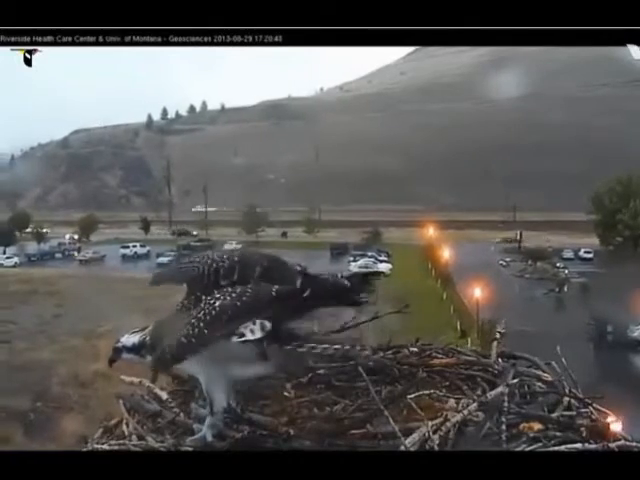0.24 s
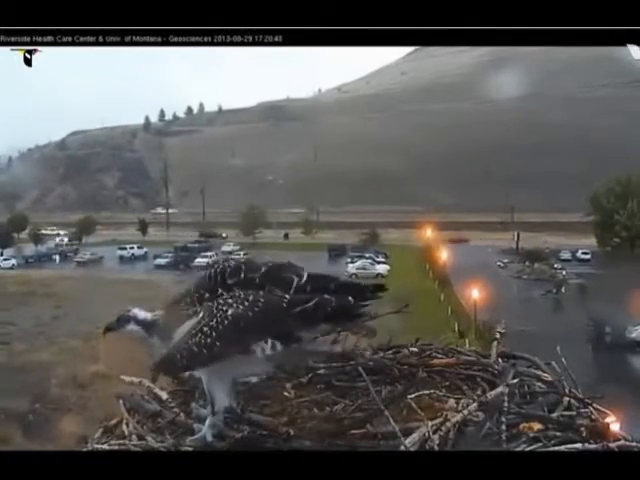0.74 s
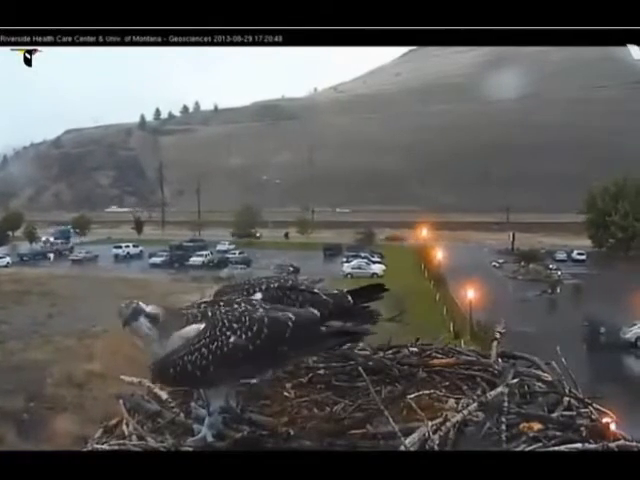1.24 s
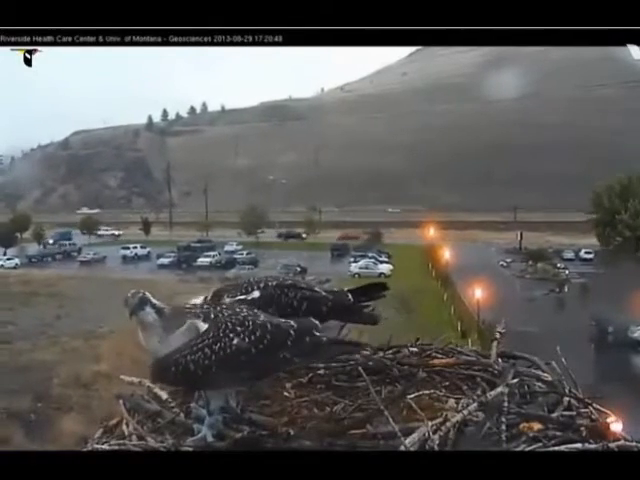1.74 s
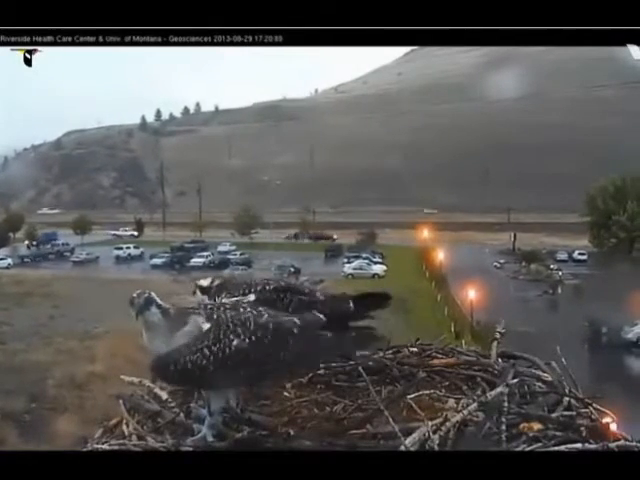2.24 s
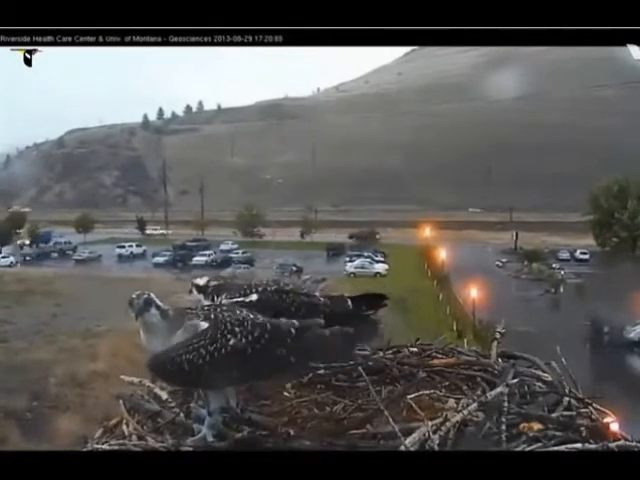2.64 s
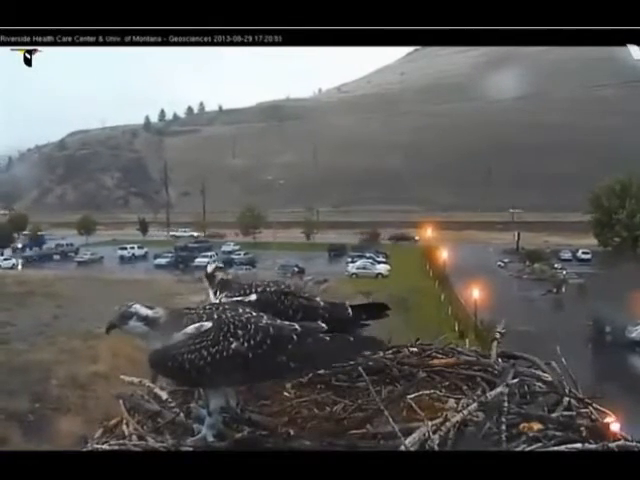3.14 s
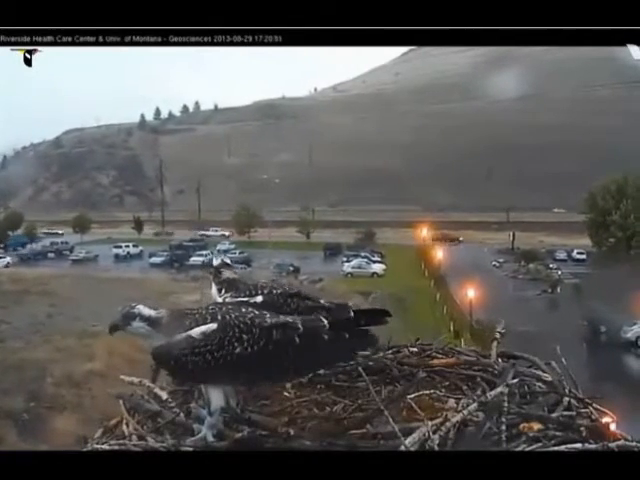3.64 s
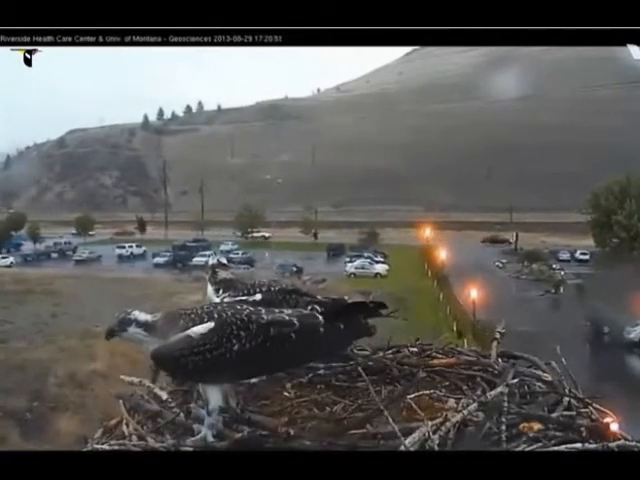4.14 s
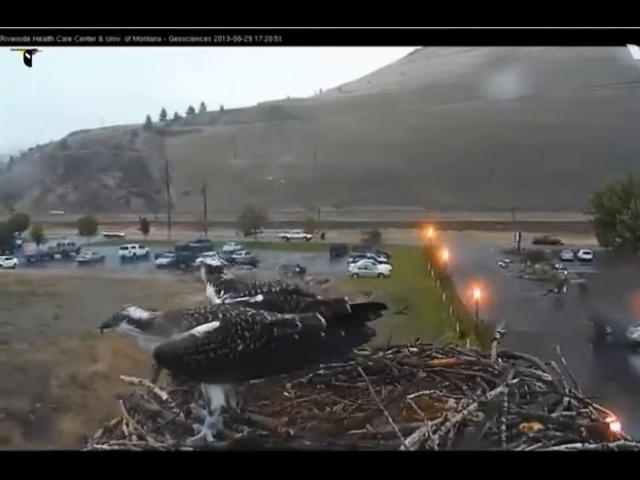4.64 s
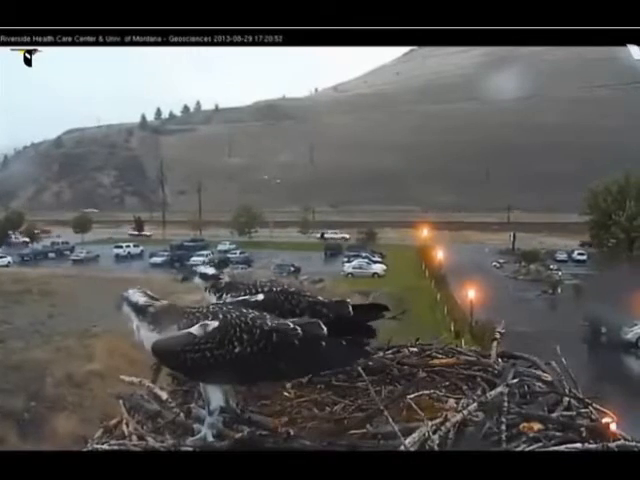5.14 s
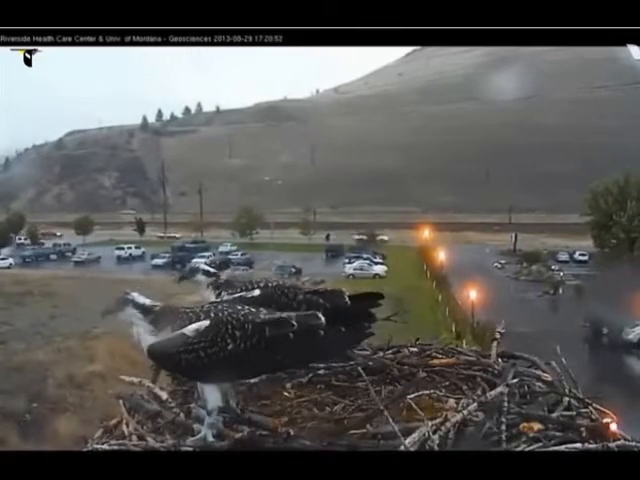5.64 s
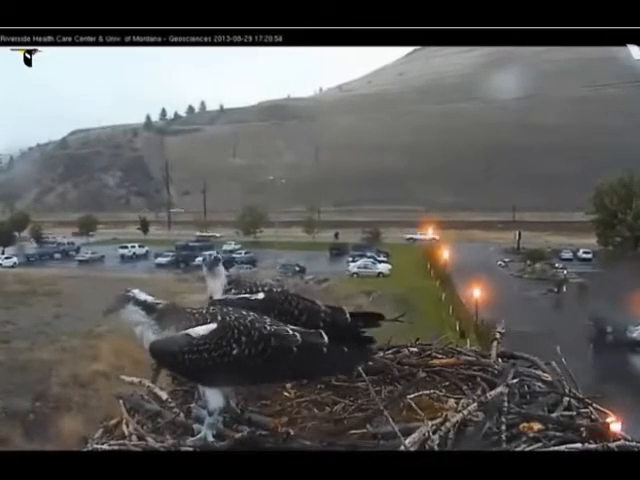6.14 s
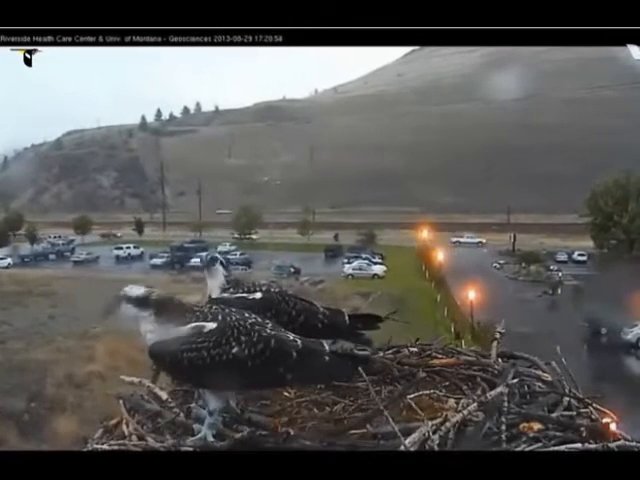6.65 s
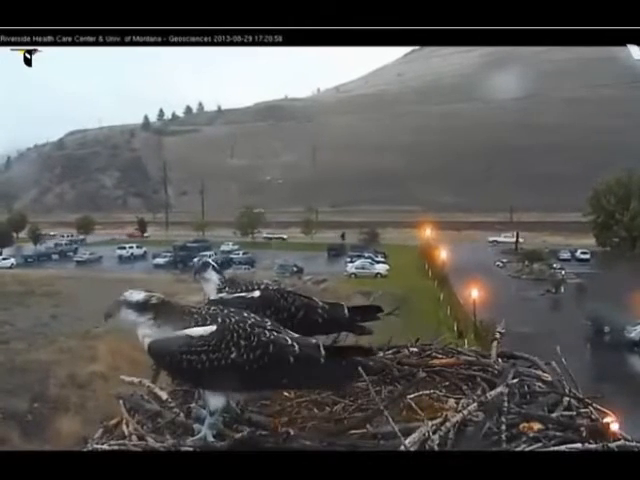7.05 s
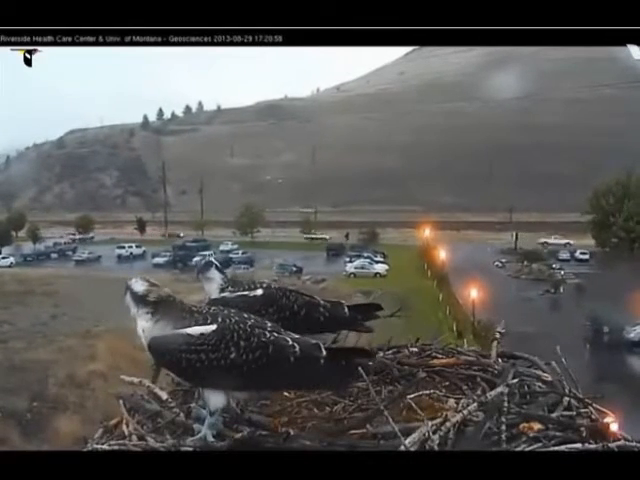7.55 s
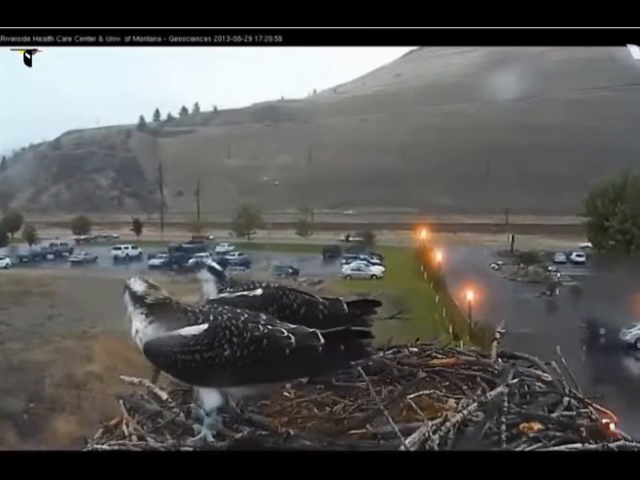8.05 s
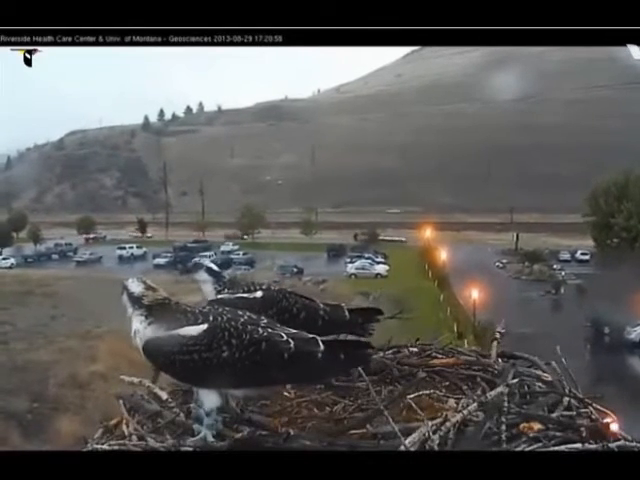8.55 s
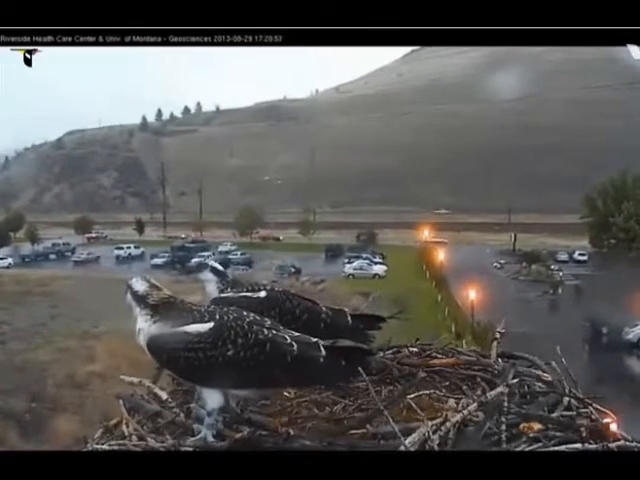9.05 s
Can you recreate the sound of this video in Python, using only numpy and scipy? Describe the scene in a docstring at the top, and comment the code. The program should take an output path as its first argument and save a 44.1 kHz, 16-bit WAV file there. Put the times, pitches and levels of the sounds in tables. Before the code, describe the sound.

Rainy, windy outdoor nest: rumbling wind buffets the microphone over even rain hiss, with plinking near drops, dull knocks and one faint bird cheep.

```python
"""On an open, high pole: steady rain and a gusting wind, heard through a small boxed microphone.
Wind roars at the housing (lumpy low noise); rain hisses all round (shaped noise over short ringing grains).
Single drops tick close by and soft thumps hit the box (struck resonances with noise bursts).
A bird gives one short cheep (a falling two-partial whistle), over an even, faint far hiss.
Roar and hiss flutter together and dip for milliseconds at a time."""
import sys
import numpy as np
from scipy import signal
from scipy.fft import rfft, irfft, next_fast_len
from scipy.io import wavfile

SR = 44100
rng = np.random.default_rng(int(sys.argv[2]) if len(sys.argv) > 2 else 0)


def int16_out(signal):
    """Quantize to a 16-bit WAV file."""
    q = np.round(np.clip(np.atleast_2d(signal).T, -1, 1) * 32767)
    wavfile.write(sys.argv[1], SR, q.astype(np.int16))


N = 409686
PADDED = next_fast_len(N)


def from_db(db):
    """Decibels to gain."""
    return 10 ** (np.asarray(db) / 20)


def rms_one(x):
    """Scale to rms 1."""
    return x / np.sqrt(np.mean(x ** 2) + 1e-20)


def peak_one(x):
    """Scale to peak 1."""
    return x / np.abs(x).max()


def butter(order, hz, kind, x):
    """Butterworth-filter x."""
    return signal.sosfilt(signal.butter(order, hz, kind, fs=SR, output="sos"), x)


def in_time(rows):
    """Join table columns by straight lines, one value a sample."""
    t_s, *columns = np.transpose(rows)
    return [np.interp(np.arange(N) / SR, t_s, column) for column in columns]


def colour(x, spectrum):
    """Weight a flat sound by a spectrum joined over log frequency; rms 1."""
    hz, db = np.transpose(spectrum)
    bin_hz = np.arange(1, PADDED // 2 + 2) * SR / PADDED
    gain = from_db(np.interp(np.log(bin_hz), np.log(hz), db))
    return rms_one(irfft(rfft(x, PADDED) * gain, PADDED)[:N])


def drift(rate_hz):
    """Slow random curve: noise at SR / 20 through a double one-pole low-pass; rms 1."""
    r = np.exp(-40 * np.pi * rate_hz / SR)
    coarse = rng.standard_normal(N // 20 + 2002)
    slow = signal.lfilter([1], [1, -2 * r, r * r], coarse)[2000:]  # filter settled
    return np.interp(np.arange(N) / 20, np.arange(len(slow)), rms_one(slow))


def ring(clicks, hz, t60_s):
    """Two-pole resonator: a unit click starts a decaying sine of initial height 1."""
    r = from_db(-60 / (t60_s * SR))
    w = 2 * np.pi * hz / SR
    return signal.lfilter([0, np.sin(w)], [1, -2 * r * np.cos(w), r * r], clicks + 1e-18)


def patchy(x, own_db, rate_hz):
    """Split into overlapping octave-spaced bands that sum flat; each flickers on its own."""
    out = 0
    spectrum = rfft(x, PADDED)
    octave = np.log2(np.arange(1, len(spectrum) + 1) * SR / PADDED / 80).clip(0, 7)
    for k in range(8):
        share = np.cos(np.pi / 2 * np.clip(octave - k, -1, 1)) ** 2
        band = irfft(spectrum * share, PADDED)[:N]
        out = out + band * from_db(own_db * drift(rate_hz))
    return out


def far_hiss():
    """Steady distant hiss: stationary noise with a fixed spectrum."""
    # far hiss spectrum: f/Hz, relative level/dB
    far_spectrum = [(2000, -15.5), (4000, 4.5), (6000, -12), (9000, -13), (12000, -32.5), (13500, -36.5)]
    level_db = -76.5
    return from_db(level_db) * colour(rng.standard_normal(N), far_spectrum)


def cheep():
    """A held then falling whistle, unsteady in level and pitch; the second partial flashes early."""
    start_s, attack_s, swell_s, release_s = 1.197, .006, .038, .03
    start_hz, hold_s, fall_hz_per_s = 1872, .024, 5800
    first_db, swell_db = -50, 3
    waver_db, waver_hz = 1.2, 15
    second_db, delay_s, width_s = -51, .012, .014
    second_attack_s, second_t60_s = .008, .07
    t = np.arange(N) / SR - start_s
    hz = start_hz - fall_hz_per_s * np.clip(t - hold_s, 0, release_s + swell_s)
    phase = 2 * np.pi * np.cumsum(hz + waver_hz * drift(60)) / SR
    turns_s = np.cumsum([0, attack_s, swell_s, release_s])
    first = from_db(first_db) * np.interp(t, turns_s, [0, from_db(-swell_db), 1, 0])
    late_s = t - delay_s
    fade_db = -60 * np.maximum(late_s - width_s, 0) / second_t60_s
    second = from_db(second_db + fade_db) * np.clip(late_s / second_attack_s, 0, 1)
    partials = first * np.sin(phase) + second * np.sin(2 * phase)
    return np.sqrt(2) * from_db(waver_db * drift(80)) * partials  # sqrt 2: levels are rms


def rain(level_db):
    """Countless drops merge to noise; nearer ones patter as uneven, briefly ringing grains."""
    # rain hiss through the port resonance: f/Hz, relative level/dB per Hz
    rain_spectrum = [(400, -26), (1200, 0.5), (1700, -6.5), (2050, -1), (2350, 3.5), (2800, 1.5),
                     (3300, -3.5), (4000, -8.5), (5000, -18), (7000, -28), (10000, -38), (12000, -37.5),
                     (13500, -58.5)]
    grains_per_s, rate_db_per_hiss_db = 450, 1.6
    patter_db, grains_in_hiss_db = -7, -10.0
    sizes = from_db(4.4 * np.minimum(rng.exponential(1, N), 3.7)) * rng.choice([-1, 1], N)
    rate_db = rate_db_per_hiss_db * (level_db - level_db.mean()) + 3 * drift(8)
    born = rng.random(N) < grains_per_s * from_db(rate_db) / SR
    clicks = sizes * born
    pitches_hz = np.geomspace(1500, 4800, 12)
    dealt = rng.integers(0, 12, N)
    # T60 of 11 cycles
    patter = rms_one(sum(ring(clicks * (dealt == k), hz, 11 / hz) for k, hz in enumerate(pitches_hz)))
    source = rng.standard_normal(N) + from_db(grains_in_hiss_db) * rms_one(clicks)
    hiss = colour(patchy(source, own_db=0.52, rate_hz=9.6), rain_spectrum)
    return from_db(level_db) * (hiss + from_db(patter_db) * colour(patter, rain_spectrum))


def wind(level_db):
    """Eddies buffet the housing: lumpy low noise whose upper edge grows rougher in the gusts."""
    # wind on the housing: f/Hz, relative level/dB per Hz
    wind_spectrum = [(25, -24), (50, -40.5), (80, -40), (120, -26.5), (160, -16.5), (270, -3.5),
                     (360, -1.5), (520, -3.5), (750, -10.5), (1100, -19), (1600, -34.5), (3000, -45),
                     (6000, -85)]
    edge_hz, edge_db_per_wind_db = 1200, 0.67
    lumps = from_db(1.0 * drift(17))
    roar = colour(lumps * patchy(rng.standard_normal(N), own_db=1.0, rate_hz=29), wind_spectrum)
    edge = butter(2, edge_hz, "high", roar)
    edge_gain = from_db(edge_db_per_wind_db * (level_db - level_db.mean()))
    return from_db(level_db) * (roar + (edge_gain - 1) * edge)


def dropouts(wind_db):
    """Gain with flat-bottomed notches, plus fast shallow random dips that deepen in the gusts."""
    # drop-outs: centre t/s, length/ms, depth/dB
    notches = [(0.134, 8.6, -12), (0.213, 7.3, -13), (0.45, 19, -9.5), (0.591, 13, -9.5),
               (0.7102, 5.8, -14), (0.7643, 6.5, -5), (0.844, 5.6, -9), (0.884, 2.7, -4), (0.897, 4, -5),
               (0.9956, 13, -8), (1.137, 4.5, -14), (1.3546, 4.2, -6), (1.403, 5.3, -10), (1.867, 4.1, -18),
               (1.961, 4.9, -11), (2.1313, 5.2, -3), (2.161, 4.4, -14), (2.197, 9.4, -9.5),
               (2.237, 2.5, -9), (2.3022, 1.4, -9), (3.807, 2.9, -7.5), (4.196, 12, -16), (4.2914, 5, -9),
               (4.363, 5.5, -8), (4.427, 17, -10.5), (4.5512, 7.6, -6), (4.785, 3.4, -4), (5.38, 5.2, -13),
               (5.411, 5.6, -16), (5.439, 6.2, -8), (5.504, 5.4, -10), (5.553, 6.8, -12), (5.622, 4.6, -12),
               (5.756, 14, -8), (5.768, 6.1, -7), (5.989, 8, -22), (6.691, 5.7, -9), (6.7305, 11, -6.5),
               (6.808, 11, -10), (7.541, 6.1, -7)]
    calm_db, gusty_db = -39.5, -34.5  # wind levels at which dips have zero and full depth
    t_ms = np.arange(N) / SR * 1000
    dips_db = -2.2 * np.maximum(drift(49) - .8, 0)
    gain_db = dips_db * np.clip((wind_db - calm_db) / (gusty_db - calm_db), 0, 1)
    for t_s, length_ms, depth_db in notches:
        near = slice(round(t_s * SR) - 1000, round(t_s * SR) + 1000)
        offset = 2 * (t_ms[near] - t_s * 1000) / length_ms
        gain_db[near] += depth_db * np.exp(-np.abs(offset) ** 4)
    return from_db(gain_db)


def drops():
    """Each near drop splashes: a brief ring in a noisy body, a snap above it and a bright tick."""
    # near drops: start t/s, ring-and-body peak/dB, ring f/Hz, snap peak/dB, tick peak/dB
    near_drops = [(0.077, -51, 2400, -43, -60), (0.193, -40, 2420, -58, -70), (0.4853, -43, 2190, -60, -77),
                  (0.5457, -45, 2060, -62, -76), (0.6624, -40, 2150, -62, -76),
                  (0.9038, -41, 2330, -62, -76), (1.0384, -50.5, 2720, -48, -70),
                  (1.0914, -39.5, 2970, -49, -47), (1.114, -42, 2830, -58, -72),
                  (1.2246, -35, 2180, -55, -61), (1.3154, -40, 3000, -57, -58),
                  (1.3304, -37, 2500, -51, -63), (1.3613, -49, 2210, -49, -66),
                  (1.392, -50, 2950, -62, -74), (1.4087, -43, 2610, -60, -76), (1.501, -34, 2340, -63, -74),
                  (1.577, -40, 2230, -42, -66), (1.605, -37, 2500, -50, -58), (1.643, -42, 2720, -66, -74),
                  (1.676, -41, 2500, -54, -70), (1.75, -35, 2420, -57, -68), (1.92, -39, 2860, -63, -74),
                  (1.98, -39, 2480, -62, -76), (2.1728, -33, 2470, -37, -55), (2.207, -46, 2600, -51, -76),
                  (2.5072, -37.5, 2370, -56, -72), (2.93, -38, 2410, -58, -71),
                  (2.9516, -35, 2600, -42, -62), (3.3837, -39.5, 2520, -60, -76),
                  (3.524, -41, 2400, -60, -76), (3.7514, -39, 2320, -62, -76),
                  (3.9492, -39.5, 2350, -44, -60), (3.9983, -39, 2440, -60, -76),
                  (4.0154, -41, 2580, -47, -56), (4.122, -37, 2470, -54, -76),
                  (4.1799, -36.5, 2350, -56, -74), (4.2042, -48, 2300, -57, -64),
                  (4.211, -35, 2480, -48, -75), (4.2657, -35.5, 2320, -61, -76),
                  (4.376, -40, 2100, -58, -53), (4.5606, -61, 2760, -48, -72), (4.711, -43, 2580, -61, -74),
                  (4.9893, -42, 2740, -54, -74), (4.995, -41, 2150, -57, -76),
                  (5.1295, -41, 2600, -59, -76), (5.271, -56, 2500, -55, -66),
                  (5.3906, -44, 1940, -57, -76), (5.4214, -34, 2220, -55, -75),
                  (5.4425, -41, 2400, -57, -70), (5.461, -41, 2680, -56, -69), (5.632, -39, 2270, -63, -60),
                  (5.666, -38.5, 2900, -62, -65), (5.7788, -47, 2250, -60, -72),
                  (6.1395, -39.5, 2460, -62, -76), (6.389, -39, 2490, -57, -76),
                  (6.499, -42, 2920, -60, -72), (6.5935, -50, 2220, -59, -62), (6.615, -41, 2250, -60, -76),
                  (6.797, -35.5, 2300, -62, -71), (7.169, -40, 2900, -52, -70),
                  (7.0569, -49, 2340, -64, -76), (7.0998, -47, 2190, -64, -78),
                  (7.1222, -45, 2460, -64, -78), (7.9493, -45, 2530, -64, -76),
                  (7.9868, -46, 2800, -51, -70), (8.1003, -54, 2500, -53, -69),
                  (8.1798, -45.5, 2950, -68, -78), (8.2033, -46, 2440, -64, -78),
                  (8.3088, -54, 2220, -60, -67), (8.7585, -40, 2250, -64, -75)]
    ring_t60_s, snap_t60_s, tick_t60_s = .016, .011, .011
    body_decay_s = .003  # time constant
    impact_db = 14  # first sample of the splash, over unit noise
    body_over_snap_db = 19  # harder snaps have noisier bodies; soft ones ring clean
    out, t = np.zeros(N), np.arange(2200) / SR
    splash = rng.standard_normal((len(near_drops), len(t)))
    splash[:, 0] = from_db(impact_db)
    for (t_s, peak_db, hz, snap_db, tick_db), noise in zip(near_drops, splash):
        broad_hz = [hz / 1.3, hz * 1.3]
        body = peak_one(butter(3, broad_hz, "band", np.exp(-t / body_decay_s) * noise))
        plink = peak_one(butter(3, broad_hz, "band", ring(1.0 * (t == 0), hz, ring_t60_s)))
        snap = peak_one(butter(2, [2700, 4600], "band", noise * from_db(-60 * t / snap_t60_s)))
        tick = peak_one(butter(2, [5000, 10000], "band", noise * from_db(-60 * t / tick_t60_s)))
        body_db = min(snap_db - peak_db + body_over_snap_db, 4)  # relative to the plink
        drop = from_db(peak_db) * peak_one(plink + from_db(body_db) * body)
        drop += from_db(snap_db) * snap + from_db(tick_db) * tick
        out[round(t_s * SR):][:len(t)] += drop
    return out


def thumps():
    """A soft blow rings the housing low for a few cycles, with a rough spray and a surge of roar."""
    # thumps on the housing: start t/s, ring peak/dB, ring f/Hz, spray noise level before band-pass/dB
    blows = [(0.601, -21.5, 383, -52), (0.766, -28, 420, -50), (1.109, -23.5, 470, -31.5),
             (1.116, -24, 520, -42), (1.138, -20.5, 388, -40), (1.166, -24, 420, -38),
             (1.277, -28, 480, -50), (1.62, -27.5, 480, -52), (2.04, -30, 453, -51),
             (2.134, -23, 480, -35.5), (2.165, -21, 346, -38), (2.98, -29, 477, -50),
             (3.399, -22.5, 480, -53), (3.842, -23.5, 305, -48), (3.919, -28, 480, -50),
             (4.045, -27.5, 331, -47), (4.087, -32, 430, -52), (4.186, -21, 394, -50),
             (4.204, -16.5, 447, -25), (4.212, -22, 487, -39), (4.222, -19.5, 402, -48),
             (4.244, -23, 330, -40), (4.266, -26, 420, -40), (4.438, -18.5, 430, -49),
             (4.591, -24, 485, -54), (4.988, -26, 700, -37), (5.419, -15.5, 497, -36),
             (5.441, -26, 450, -41), (5.893, -21.5, 960, -40), (6.316, -24.5, 450, -52),
             (6.448, -34, 450, -52), (6.739, -26, 426, -34.5), (7.497, -25.5, 420, -50),
             (8.709, -28.5, 380, -56), (8.76, -30, 760, -56), (9.135, -21.5, 420, -53)]
    ring_t60_s, spray_t60_s, surge_t60_s = .015, 0.065, 0.085
    surge_below_db = -9  # surge noise before its band-pass, relative to the ring peak
    out, t = np.zeros(N), np.arange(6000) / SR
    contact = t / 0.00022  # time in units of the rounded contact
    push = butter(4, 200, "high", contact * np.exp(-contact))  # no deep bass passes
    for (t_s, peak_db, hz, spray_db), noise in zip(blows, rng.standard_normal((len(blows), len(t)))):
        knock = from_db(peak_db) * peak_one(ring(push, hz, ring_t60_s))
        spray = butter(4, [900, 3100], "band", noise * from_db(spray_db - 60 * t / spray_t60_s))
        surge_db = peak_db + surge_below_db - 60 * t / surge_t60_s
        surge = butter(2, [220, 900], "band", noise * from_db(surge_db))
        out[round(t_s * SR):][:len(t)] += knock + spray + surge
    return out


def scene():
    """Wind and rain flutter and drop out together; far hiss, drops, thumps and cheep do not."""
    # gusts: t/s, wind roar level/dB, rain hiss level/dB, both before flutter and drop-outs
    gusts = [(0.0, -32, -55), (0.07, -31, -52.5), (0.27, -31.5, -53.5), (0.4, -32, -55), (0.58, -34, -54.5),
             (0.63, -28.5, -55.5), (0.73, -32, -54), (0.9, -30, -55), (1.09, -34.5, -54.5),
             (1.11, -27, -54), (1.58, -38.5, -55), (1.95, -32.5, -55), (2.0, -36, -55),
             (2.05, -28.5, -54.5), (2.11, -36, -55.5), (2.15, -30, -53.5), (2.27, -29, -53.5),
             (2.52, -32.5, -56.5), (2.57, -32.5, -56), (2.66, -38, -56.5), (2.7, -35.5, -56),
             (2.75, -38.5, -56), (2.97, -31.5, -55), (3.08, -36, -55.5), (3.59, -33.5, -55.5),
             (3.85, -28, -55), (3.88, -35.5, -54.5), (3.98, -33, -55), (4.01, -27, -52.5), (4.07, -34, -52),
             (4.13, -31, -55.5), (4.27, -25, -53.5), (4.34, -30, -53.5), (4.38, -28.5, -53),
             (4.42, -36.5, -54), (4.45, -30, -55), (4.63, -38.5, -56), (5.0, -31.5, -57), (5.13, -31, -56),
             (5.28, -30, -56.5), (5.41, -27, -54.5), (5.7, -32, -56), (6.18, -35.5, -57),
             (6.34, -32.5, -57), (6.4, -35, -57.5), (6.51, -32.5, -55), (6.56, -34.5, -55.5),
             (6.9, -33.5, -56), (7.24, -34.5, -56.5), (7.32, -37.5, -55), (7.36, -33, -56),
             (7.48, -40.5, -56.5), (7.51, -35.5, -56), (7.6, -38, -56.5), (8.05, -35, -56.5),
             (8.41, -41, -56.5), (8.69, -37, -57), (9.06, -38.5, -56.5), (9.13, -32.5, -57),
             (9.29, -38.5, -56.5)]
    flutter_rms_db, flutter_rate_hz, rain_share = 0.72, 17.3, 0.56
    wind_db, rain_db = in_time(gusts)
    flutter_db = flutter_rms_db * drift(flutter_rate_hz)
    weather = wind(wind_db + flutter_db) + rain(rain_db + rain_share * flutter_db)
    mix = far_hiss() + cheep() + weather * dropouts(wind_db) + drops() + thumps()
    return mix[None]


def record(dry):
    """The microphone loses the deep bass; both ends fade in a few milliseconds; the top is cut."""
    low_cut_hz, top_cut_hz = 58, 15000  # top: stop-band edge, 50 dB down
    thin = butter(3, low_cut_hz, "high", dry)
    faded = thin * signal.windows.tukey(N, 1 / 1000)
    return signal.sosfilt(signal.cheby2(12, 50, top_cut_hz, fs=SR, output="sos"), faded)


dry = scene()
out = record(dry)
int16_out(out)
```